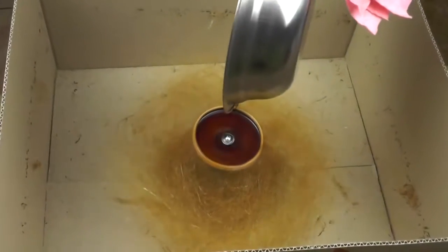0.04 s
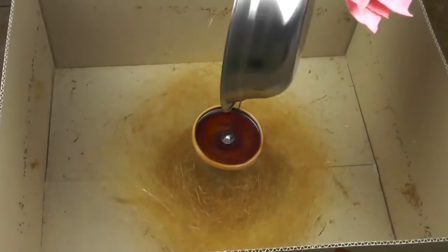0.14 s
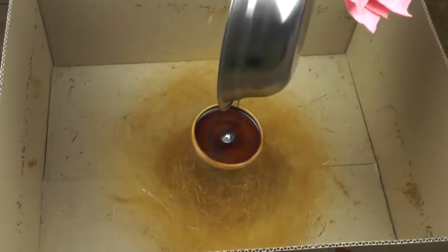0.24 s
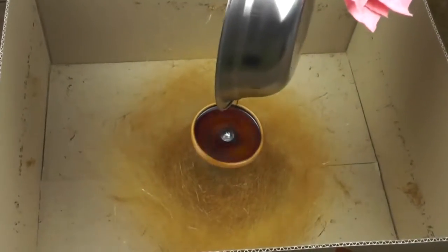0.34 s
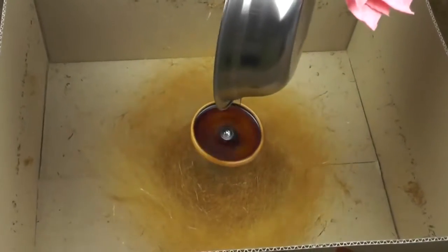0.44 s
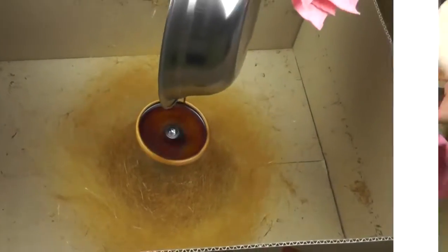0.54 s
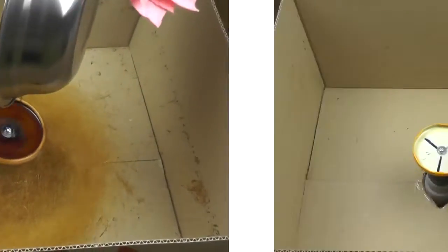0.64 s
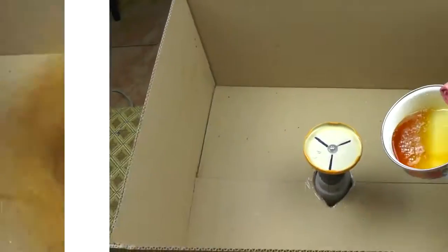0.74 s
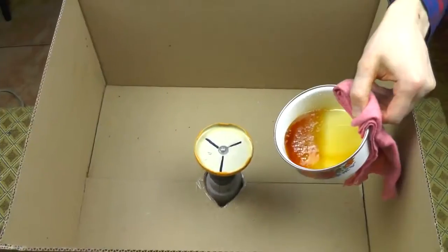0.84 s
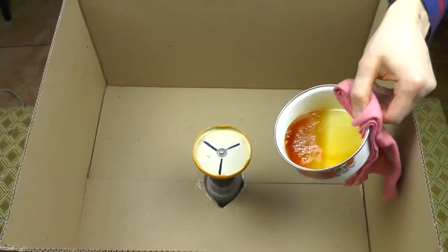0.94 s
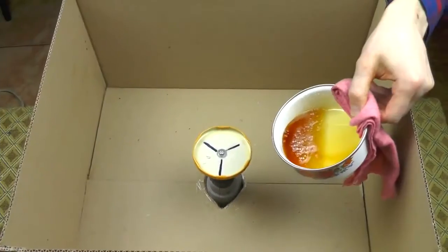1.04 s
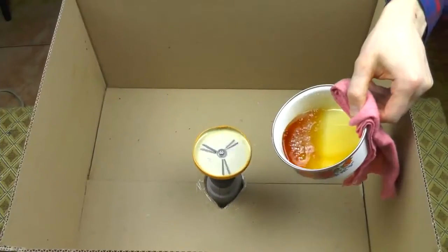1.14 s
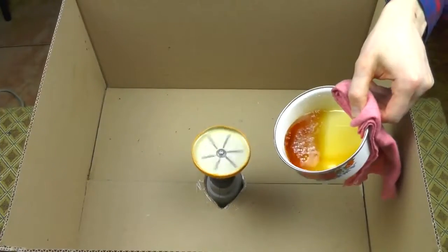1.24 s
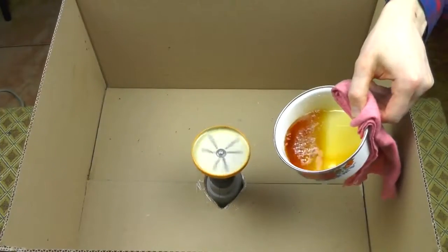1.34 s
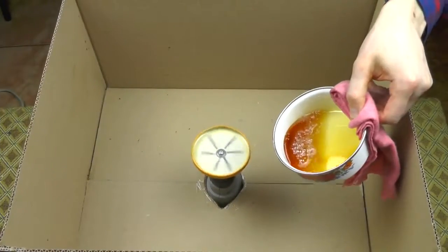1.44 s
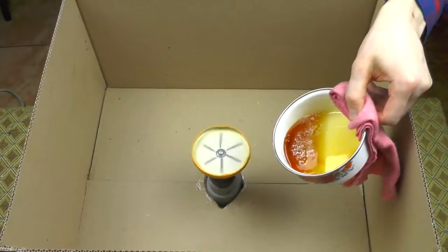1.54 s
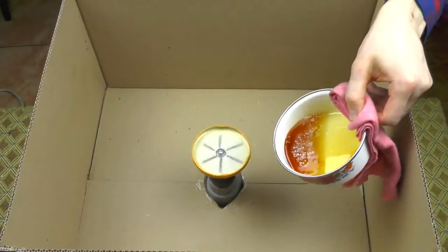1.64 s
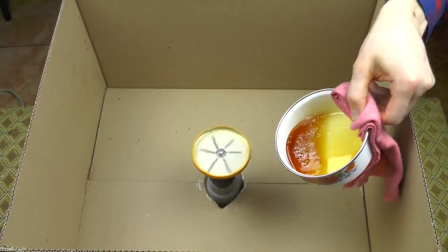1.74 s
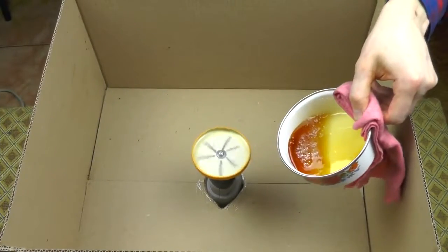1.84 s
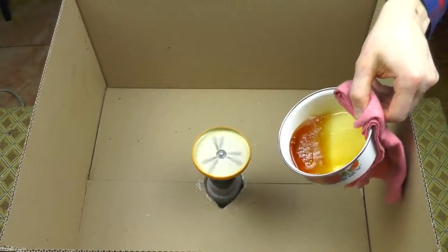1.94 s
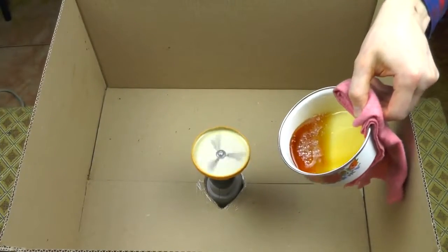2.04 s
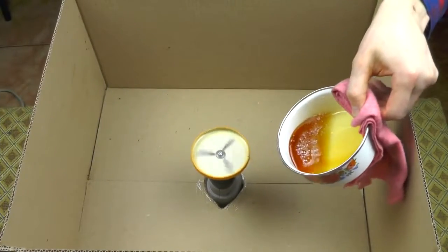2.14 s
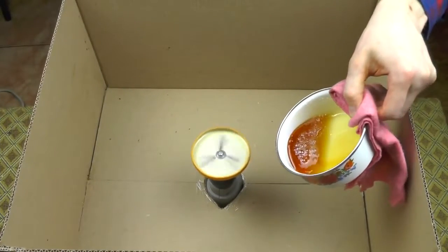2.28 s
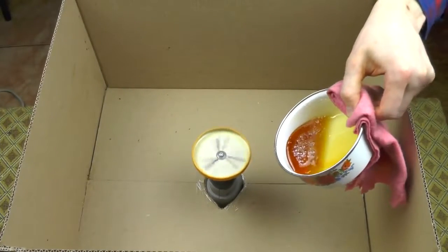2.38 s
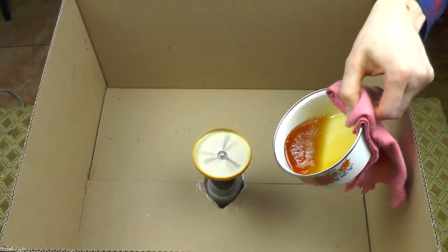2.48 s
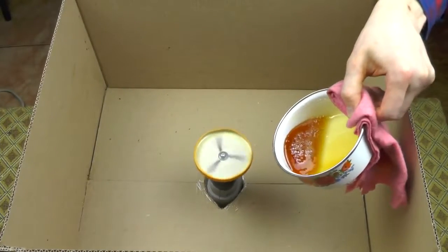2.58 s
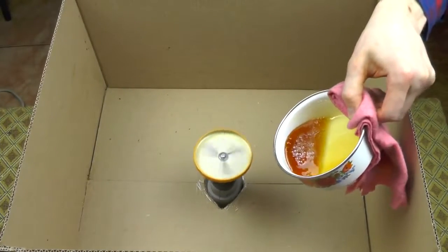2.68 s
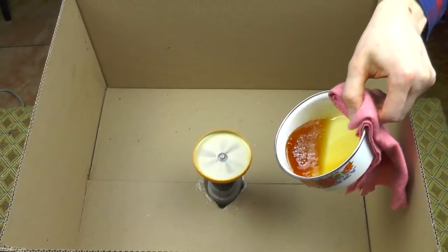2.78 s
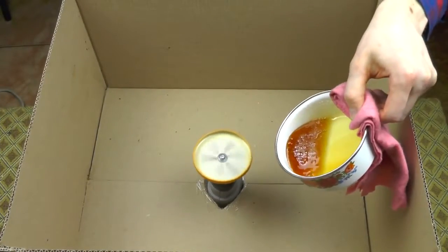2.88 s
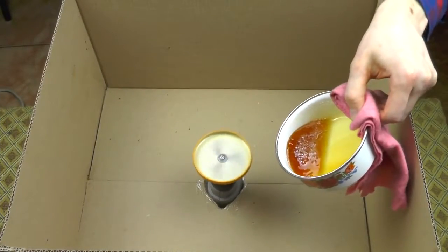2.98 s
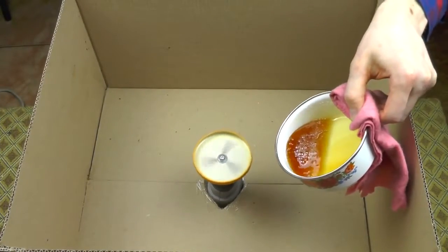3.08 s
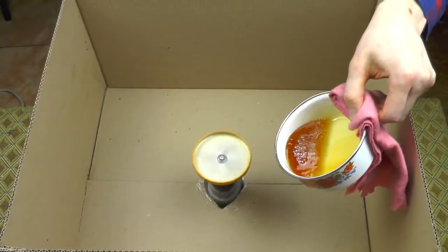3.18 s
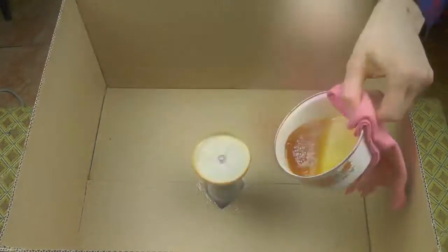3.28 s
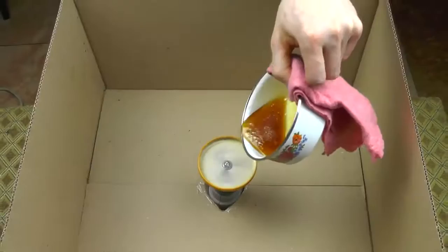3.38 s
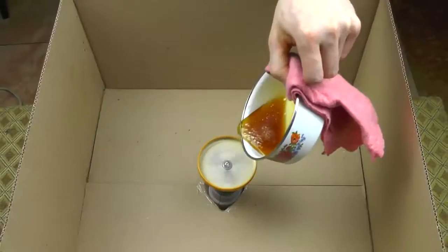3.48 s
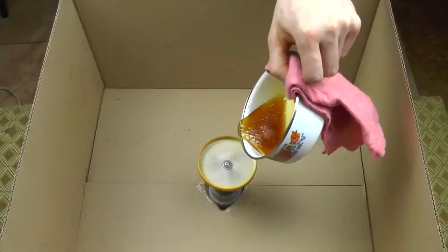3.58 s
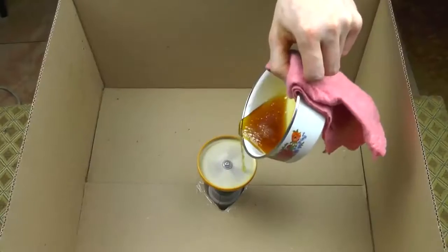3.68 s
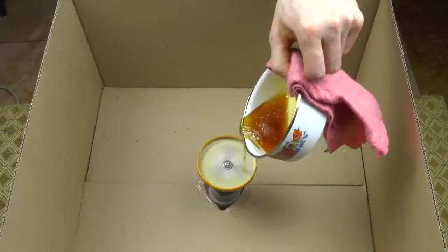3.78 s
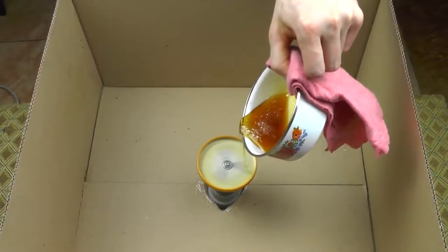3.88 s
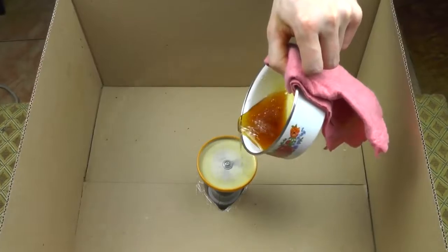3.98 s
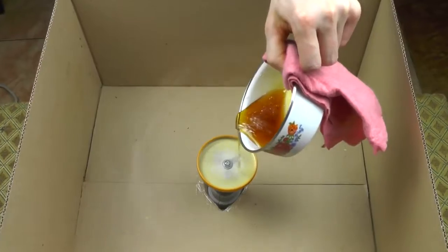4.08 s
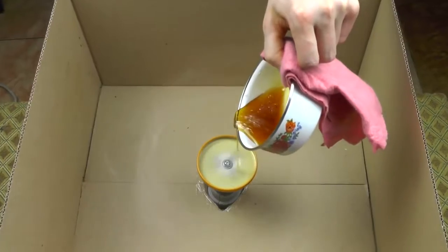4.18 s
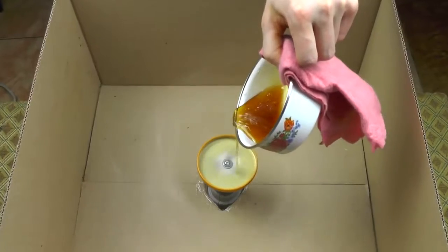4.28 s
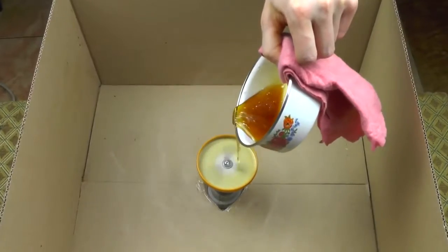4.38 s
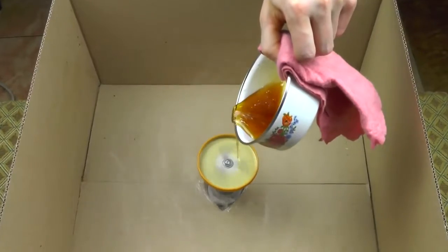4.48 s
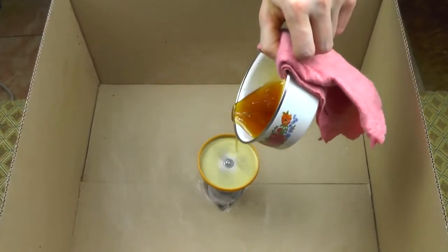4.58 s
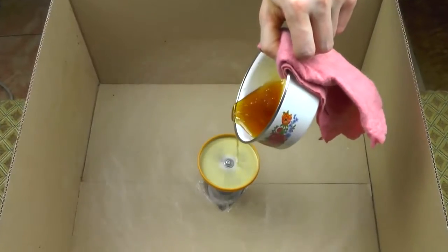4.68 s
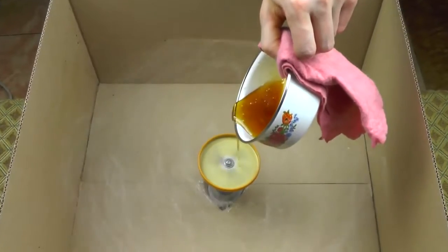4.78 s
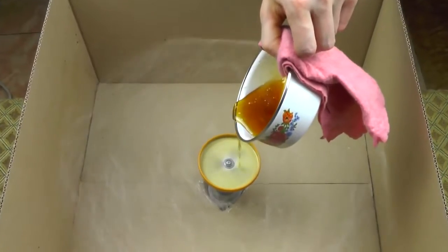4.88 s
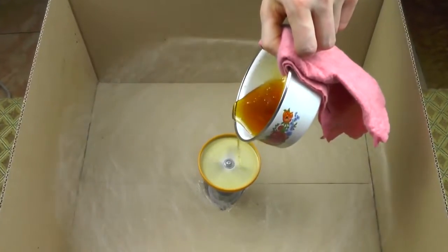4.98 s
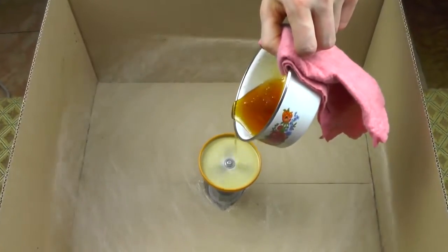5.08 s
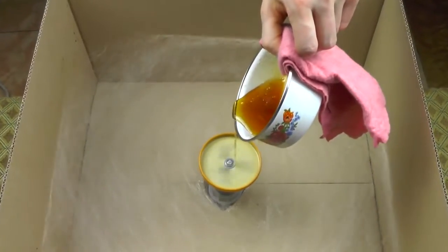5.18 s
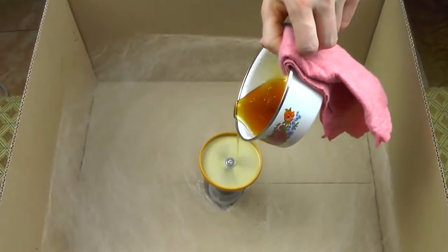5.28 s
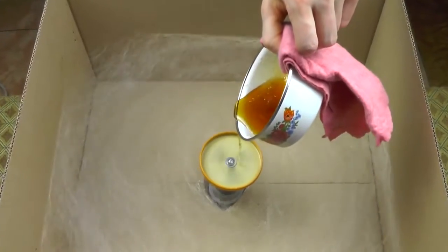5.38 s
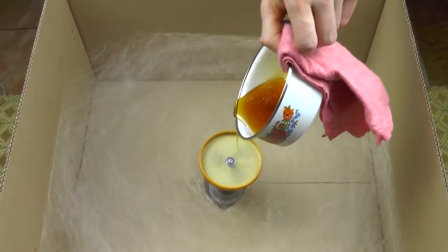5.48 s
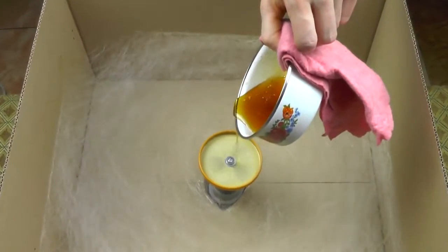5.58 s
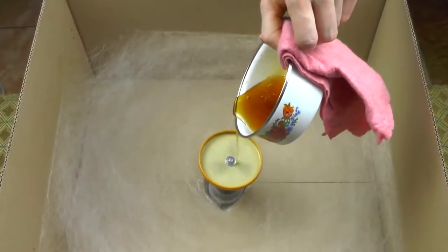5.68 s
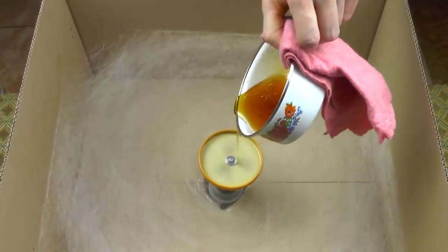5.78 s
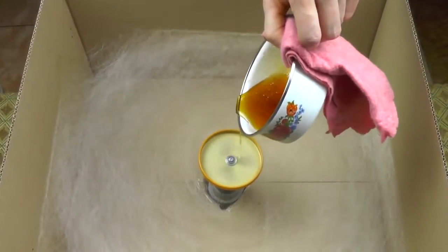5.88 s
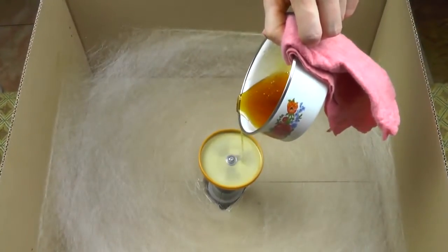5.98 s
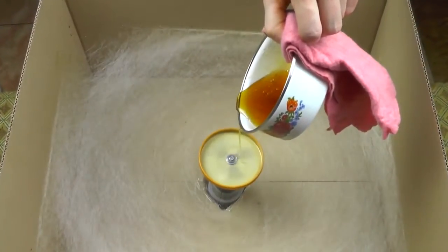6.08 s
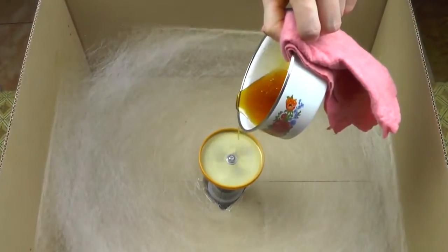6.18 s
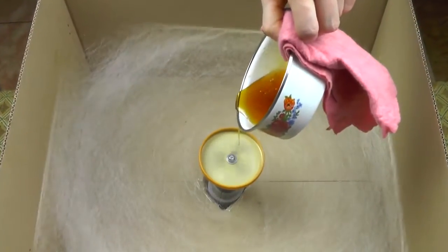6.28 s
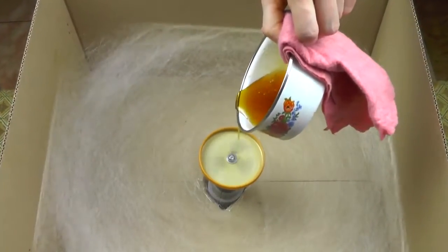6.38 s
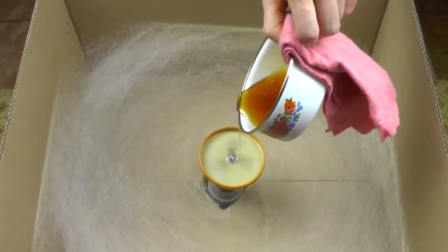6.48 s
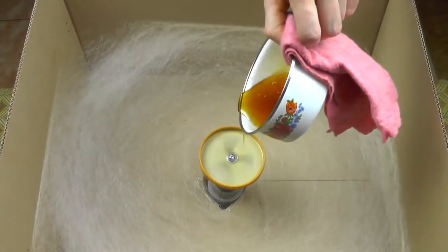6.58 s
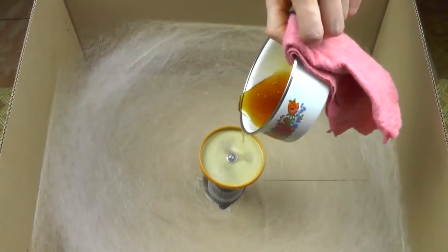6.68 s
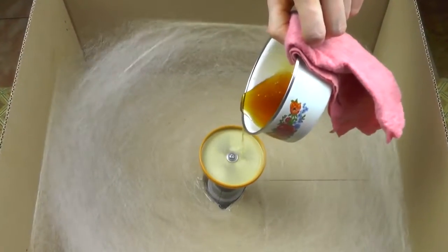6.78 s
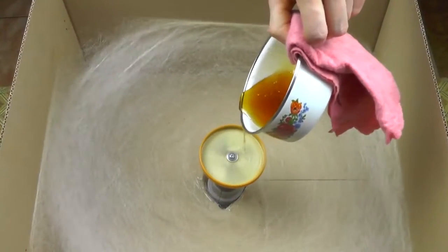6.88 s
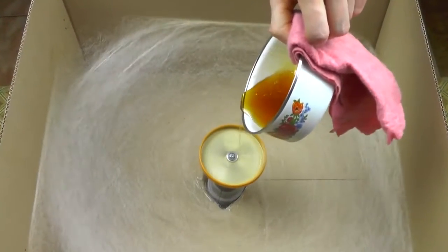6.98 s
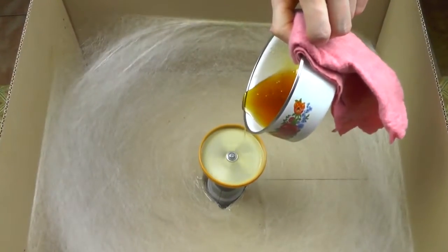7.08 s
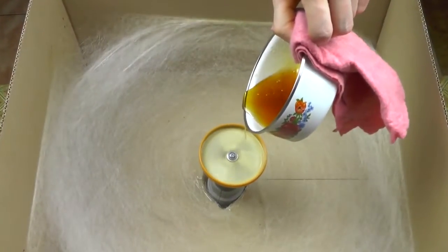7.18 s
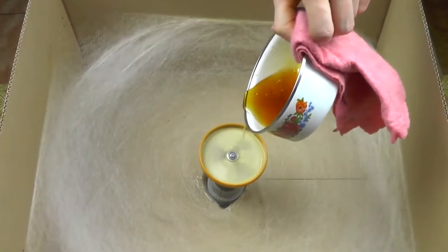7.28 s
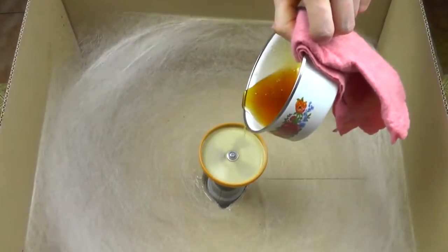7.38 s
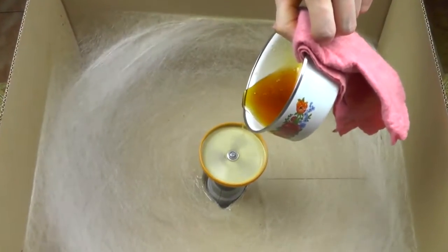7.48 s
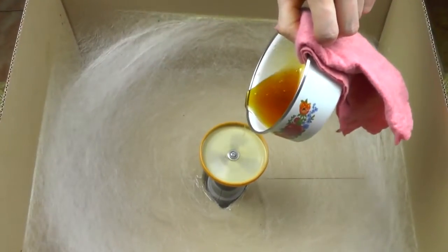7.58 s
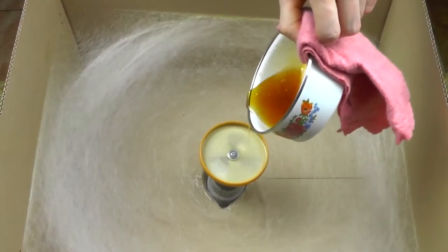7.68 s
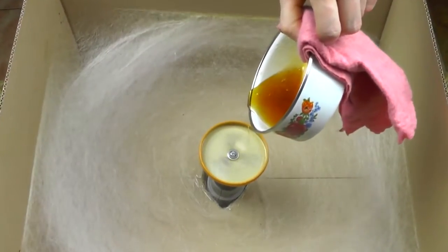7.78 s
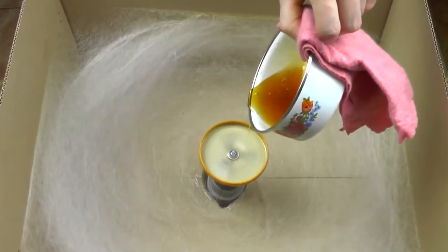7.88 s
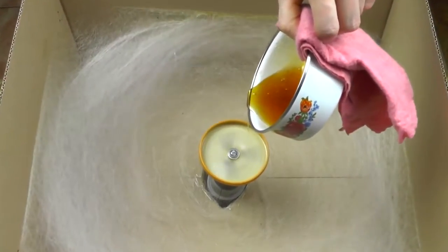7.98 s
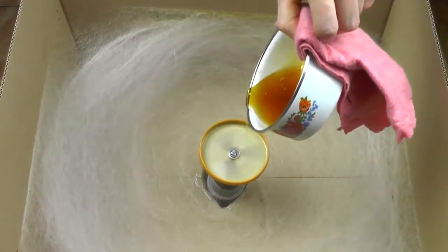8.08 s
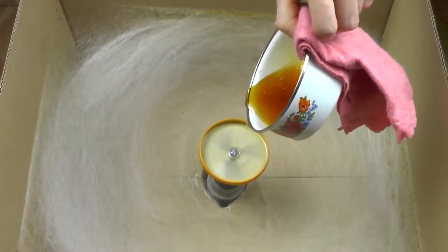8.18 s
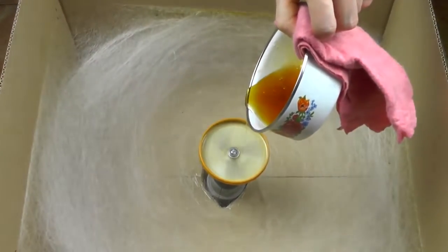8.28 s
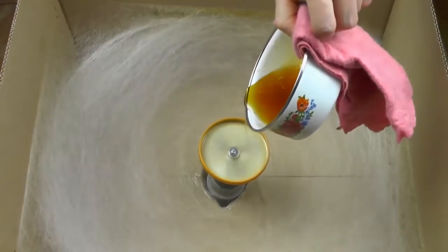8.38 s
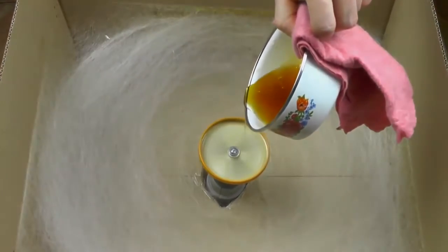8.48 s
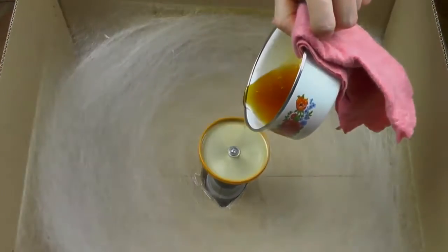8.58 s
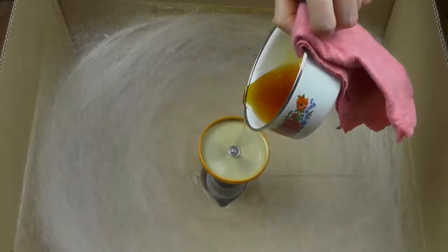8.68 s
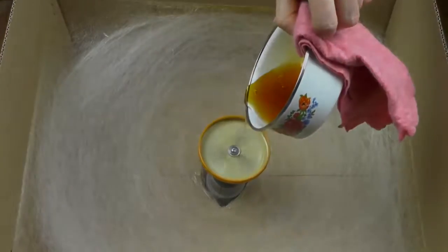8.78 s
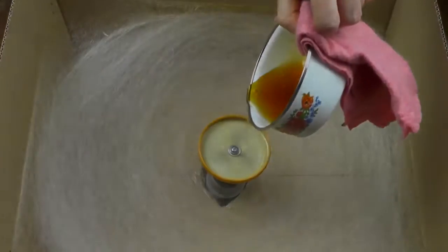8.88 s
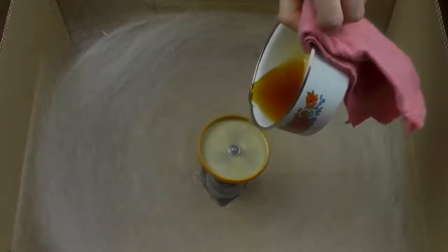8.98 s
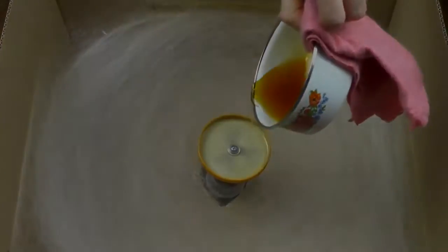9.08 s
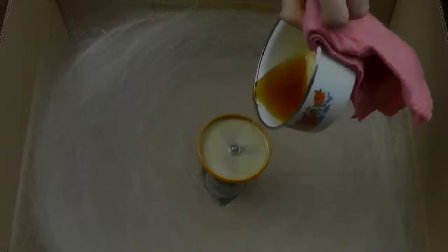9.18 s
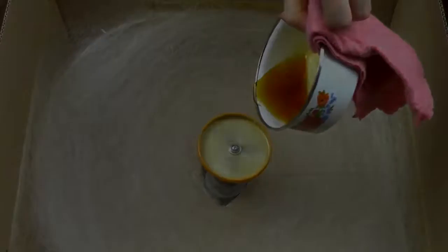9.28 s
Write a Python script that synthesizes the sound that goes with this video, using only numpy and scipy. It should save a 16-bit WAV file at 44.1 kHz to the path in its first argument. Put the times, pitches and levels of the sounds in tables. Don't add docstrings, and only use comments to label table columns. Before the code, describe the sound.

Heard closely in stereo, a small brush motor whirs at full speed in a cardboard box: a breathy rush with buzzing shaft tones, fading out between 0.75 and 0.95 s. A quiet low room hush remains, with tiny switch ticks near 1.05 s. At about 1.27 s the switch bites and loose brushes chatter harshly, with dull knocks, the strongest near 1.47 s, then the rattle coasts down. A second push at 1.93 s clatters until 2.35 s, knocks and fades again. The third, at 2.69 s, rattles as a rough whine climbs from about 2.9 s, reaching full speed by 3.6 s. Then a steady, dense, airy hiss with a low hum continues while syrup is poured and flung. A faint thin whistle appears early, another around 6 to 7.7 s. The hiss gradually dulls, and from 8.1 s eases slightly quieter until it stops at about 9.3 s.

```python
import sys
import numpy as np
from scipy import signal
from scipy.fft import rfft, irfft, next_fast_len
from scipy.io import wavfile
from scipy.ndimage import uniform_filter1d

SR = 44100
rng = np.random.default_rng(int(sys.argv[2]) if len(sys.argv) > 2 else 0)


def wrap_up_sound(samples):
    columns = np.atleast_2d(samples).T
    tamed = np.clip(columns, -1, 1)
    steps = np.round(tamed * 32767).astype(np.int16)
    wavfile.write(sys.argv[1], SR, steps)


def invert_db(level):
    return 10 ** (np.asarray(level, dtype=float) / 20)


N = 411888
T = np.arange(N) / SR
M = next_fast_len(N + SR)
HZ = np.maximum(np.fft.rfftfreq(M, 1 / SR), 1)
FREE_HZ = 493
STEADY_FROM_S = 3.6

# time_s, shaft_hz
SHAFT_SPEED = [(2.7, 130), (2.88, 264), (3.0, 291), (3.08, 320), (3.14, 345), (3.2, 387), (3.3, 445),
               (3.4, 480), (3.5, 491), (3.6, 493), (4.5, 492.8), (6.3, 492.2), (6.8, 490.8), (7.5, 489.5),
               (8.0, 491), (9.34, 490.5)]
# multiple_of_shaft, level_db
SHAFT_TONES = [(1, -1), (2, 3.5), (12, -20), (13, -9.5), (27, -22)]
# pitch_hz, level_db_per_hz
RUN_AIR_SPECTRUM = [(20, -36), (70, -45), (130, -33), (320, -21.5), (480, -15.5), (900, -10.5),
                    (1720, -4.5), (1900, -14), (3200, -14), (4400, -12.5), (6900, -17), (10800, -19.5),
                    (12600, -20), (15700, -24.5)]
# pitch_hz, width_hz, level_db
RUN_RESONANCES = [(168.5, 15, -21), (496, 38, -13.5), (668, 19.5, -11), (864, 41, -4.5), (1045, 39, -3),
                  (1260, 24, -7), (1384, 34, -2.5), (1616, 18, -12), (1680.5, 30, 1), (2064, 76, -8.5),
                  (2590, 190, -16), (3610, 47, -7.5), (3920, 170, -11.5), (4490, 54, -10.5),
                  (4830, 45, -10), (5940, 170, -14), (7880, 400, -15), (9580, 400, -17), (11840, 170, -16),
                  (13200, 800, -16.5)]
# multiple_of_shaft, start_s, end_s, singing_db, resting_db
THIN_WHISTLES = [
    (24, 5.9, 7.7, -40.5, -49),
    (26, 3.3, 4.9, -50, -58),
]
# full_chatter_s, last_25_db_rise_s, chatter_end_s, driven_hiss_db, coasting_hiss_db
SWITCH_JOGS = [
    (1.262, .01, 1.49, -29.5, -35.5),
    (1.933, .008, 2.35, -29, -31.5),
    (2.69, .06, 3.25, -26.6, -70),
]
# start_s, level_db (below full)
SWITCH_BITE = [
    (1.262, -24),
    (1.289, -15),
    (1.311, -5),
    (1.332, 0),
]
# centre_s, half_length_s, shell_ring_db, box_thrum_db
SHAKING_FITS = [(1.326, 0.023, -26, -37), (1.415, 0.04, -23.5, -38), (1.487, .03, -29, -30.5),
                (1.728, 0.045, -36, -35), (1.79, 0.052, -37, -36.5), (1.95, .03, -31, -33),
                (2.084, 0.013, -22, -42), (2.13, .04, -40, -32.5), (2.29, .04, -35, -42),
                (2.506, .05, -32.5, -44), (2.61, 0.04, -36, -55), (2.755, 0.036, -29, -30.5),
                (2.916, .04, -28, -40), (2.993, 0.028, -43, -31.5), (3.072, .03, -29, -38),
                (3.273, .04, -29, -45)]
# pitch_hz, level_db_per_hz
BRUSH_SPECTRUM = [(150, -25), (330, -15.5), (510, -12), (800, -8), (1300, -10), (1700, -10.5),
                  (2300, -17.5), (3500, -10.5), (4700, -13.5), (5600, -19), (8000, -20.5), (10800, -24),
                  (12800, -21), (15700, -28.5)]
# pitch_hz, width_hz, level_db
HOUSING_MODES = [(3110, 30, -5), (3590, 30, 1), (3750, 50, -7), (4130, 70, -5), (4480, 20, 4),
                 (4720, 70, -10), (5450, 50, -8), (6120, 60, -7), (7170, 90, -10)]
# pitch_hz, width_hz, level_db
BOX_PANELS = [(103.5, 12, -17.5), (168.2, 6.9, -0.5), (182.7, 11, -1), (199, 19, -6.5), (218.5, 7.4, -5),
              (280, 4.7, -3.5)]
# pitch_hz, width_hz, level_db
HEAD_SHELL = [(1227, 15, 0), (1200, 45, -6), (1265, 60, -10)]
# start_s, peak_db
SLACK_KNOCKS = [(1.054, -44), (1.266, -31), (1.292, -26), (1.312, -17), (1.332, -24), (1.374, -14),
                (1.41, -22), (1.454, -22), (1.471, -9), (1.93, -21), (1.995, -9), (2.077, -25),
                (2.209, -33), (2.28, -8)]
# pitch_hz, level_db_per_hz
FIRST_AIR_SPECTRUM = [(12, -59.5), (20, -30), (81, -31), (153, -20), (239, -22.5), (268, -17), (308, -20.5),
                      (481, -10), (772, -10.5), (965, -2), (3200, -10), (3790, -8.5), (8740, -17),
                      (12200, -16.5), (15700, -20)]
# pitch_hz, width_hz, level_db
FIRST_RESONANCES = [(151, 9.6, -13.5), (930, 33, -13), (1280, 81, 2), (1430, 110, -2), (1695, 78, -0.5),
                    (2480, 80, -2), (3890, 110, -3), (4900, 47, -1), (8060, 60, -5), (9870, 60, -3),
                    (11830, 150, -18)]
# start_s, peak_db
SWITCH_TICKS = [(1.055, -45), (1.087, -52), (1.289, -35), (1.931, -36)]
# centre_s, level_db
LOW_BUMPS = [(1.48, -52), (2.75, -49), (2.9, -44), (3.0, -46), (3.4, -46), (3.46, -52), (.55, -56)]
# pitch_hz, level_db_per_hz
ROOM_SPECTRUM = [(12, -41), (20, -35), (59, -8), (81, -12), (283, -1), (364, -9), (407, -8), (1310, -21),
                 (2050, -25), (3580, -23), (9240, -32), (12200, -26), (15700, -26)]
# pitch_hz, likeness (0 to 1)
CHANNEL_LIKENESS = [(60, 0.23), (160, 1), (450, 0.92), (1220, 0.8), (2010, 0.89), (4400, 0.89),
                    (5300, 0.96), (7400, 1), (9080, 0.76), (10300, 0.75), (11500, 1), (13000, 0.65)]
# pitch_hz, left_minus_right_db
CHANNEL_LEAN = [(60, 1), (110, 0), (200, -4), (380, -1.5), (700, -0.5), (1290, 0.5), (2380, 1), (4400, 0),
                (8120, 0.5), (15000, 0.5)]


def steady_run():
    end_fade_s, end_fade_db = 8.14, -3
    air_db, air_power_of_speed = -22, 4.7
    shaft_hz, turning = in_time(SHAFT_SPEED)
    ending = np.maximum(0, T - end_fade_s) / (T[-1] - end_fade_s)
    close = invert_db(end_fade_db * ending ** 1.6)

    top_db = 1.08 - 0.11 * (T - STEADY_FROM_S)
    air = rush(RUN_AIR_SPECTRUM, RUN_RESONANCES, peak_db=0.0, patchy_db=0.43, rate=7.0, low_hz=300, top_db=top_db)
    rushing = turning * invert_db(air_db) * (shaft_hz / FREE_HZ) ** air_power_of_speed * air

    tone_db = -44 + np.clip(FREE_HZ - shaft_hz, 0, 5)
    lines = invert_db(tone_db) * tones(shaft_hz, SHAFT_TONES, wobble=0.00065, flutter_db=1.1)
    whistles = 0
    for multiple, start, end, sing_db, rest_db in THIN_WHISTLES:
        turns_s = [start - .3, start + .3, end - .15, end + .15]
        level_db = np.interp(T, turns_s, [rest_db, sing_db, sing_db, rest_db])
        gain = invert_db(level_db)
        whistles = whistles + gain * tones(shaft_hz, [(multiple, 0)], wobble=0.0006, flutter_db=1.8)
    mains_hz = 100.5
    hum = invert_db(-66.5) * tones(mains_hz, [(0.97, 0)], wobble=.004, flutter_db=4)
    return close * (rushing + (T > STEADY_FROM_S) * (lines + whistles + hum))


def spin_up():
    whine_from_s, whine_rest_db = 2.88, -44
    shaft_hz, _ = in_time(SHAFT_SPEED)
    whine_db = np.maximum(hump(shaft_hz, centre=298, span=24, top_db=-30), whine_rest_db)
    sweep_db = hump(shaft_hz, centre=417, span=80, top_db=-43)
    hum_db = hump(shaft_hz, centre=480, span=65, top_db=-44)

    whine = .8 + 0.7 * drift(130)
    whine = whine * tones(shaft_hz, [(9.15, -2), (9.5, 3), (9.85, -4)], wobble=0.007, flutter_db=2.0)
    sweep = .5 + drift(160)
    sweep = sweep * tones(shaft_hz, [(19, 4), (21, -5), (28.5, -1)], wobble=0.0061, flutter_db=3.5)
    hum = tones(shaft_hz, [(.8, -7), (1, -6), (2, 8)], wobble=0.0038, flutter_db=5.5)
    running_up = (T > whine_from_s) & (T < STEADY_FROM_S)
    return running_up * (invert_db(whine_db) * whine + invert_db(sweep_db) * sweep + invert_db(hum_db) * hum)


def jogging():
    hiss_gain, thrum_gain, ring_gain, top_db = jog_levels()
    sizes = invert_db(4.3 * np.minimum(rng.exponential(1, N), 5)) * rng.choice([-1, 1], N)
    clicks_per_s = np.array([[400], [300], [2500]])
    clicks = sizes * (rng.random((3, N)) < clicks_per_s / SR) + 1e-18

    thrum = thrum_gain * evened(resonate(clicks[0], BOX_PANELS), .6)
    ring = ring_gain * invert_db(-1.5) * evened(resonate(clicks[1], HEAD_SHELL), .7)
    rings = sum(swell(4.7, 4.9) * resonate(clicks[2], [mode]) for mode in HOUSING_MODES)
    housing = invert_db(-5) * rms_one(rings)
    hiss = rush(BRUSH_SPECTRUM, [], peak_db=0, patchy_db=0.5, rate=7.4, low_hz=2000, top_db=top_db)
    bite = np.max([(T > s) * invert_db(db) for s, db in SWITCH_BITE], axis=0)
    return bite * (thrum + ring + hiss_gain * (housing + invert_db(0.1) * hiss))


def jog_levels():
    build_db, build_s = 3, .08
    coast_sag_db_per_s, thrum_sag_db_per_s = 13, 14
    drive = driven(rise_share=1, fall_db_per_s=58)
    last_end = SWITCH_JOGS[-1][2]
    coasting = (T > SWITCH_JOGS[0][0]) & (T < last_end)

    hiss_db, thrum_db = [], []
    for db, (full, _, _, driven_db, _) in zip(drive, SWITCH_JOGS):
        hiss_db.append(db + driven_db - build_db * np.exp(-np.abs(T - full) / build_s))
    for _, _, end, _, coast_db in SWITCH_JOGS:
        hiss_db.append(np.where(T > end, coast_db - coast_sag_db_per_s * (T - end), -99))
    for db, jog in zip(driven(1.1, fall_db_per_s=103), SWITCH_JOGS):
        thrum_db.append(db - thrum_sag_db_per_s * (T - jog[0]))
    ring_db = driven(1.1, fall_db_per_s=120)

    thrum = invert_db(-35.5 + np.max(thrum_db, axis=0)) + coasting * invert_db(-50)
    ring = invert_db(-36 + np.max(ring_db, axis=0)) + coasting * invert_db(-50)
    for s, half, shell_db, box_db in SHAKING_FITS:
        thrum = np.maximum(thrum, invert_db(hump(T, s, half, box_db)))
        ring = np.maximum(ring, invert_db(hump(T, s, half, shell_db)))

    top_db = -1 + 1.5 * (np.minimum(T, last_end) - SWITCH_BITE[0][0])
    top_db = top_db + 6.5 * (1 - invert_db(np.max(drive, axis=0)))
    return invert_db(np.max(hiss_db, axis=0)), thrum, ring, top_db


def driven(rise_share, fall_db_per_s):
    levels = []
    for full, rise, end, _, _ in SWITCH_JOGS:
        rising_db = np.minimum(0, 25 * (T - full) / (rise_share * rise))
        levels.append(rising_db - fall_db_per_s * np.maximum(0, T - end))
    return levels


def knocks():
    length, decay_s = 2000, 0.0065
    out = np.zeros(N)
    bursts = rng.standard_normal((len(SLACK_KNOCKS), length)) * np.exp(-np.arange(length) / SR / decay_s)
    for (s, db), burst in zip(SLACK_KNOCKS, bursts):
        i = round(s * SR)
        out[i:i + length] += invert_db(db - 11.5) * burst
    dull = signal.sosfilt(signal.butter(1, [400, 6000], "band", fs=SR, output="sos"), out)
    return dull + invert_db(13) * resonate(out, HEAD_SHELL)


def first_spell():
    shaft_hz, fade_from_s, fade_to_s, fade_bend = 489.1, 0.75, 0.96, 0.87
    fade = np.clip((fade_to_s - T) / (fade_to_s - fade_from_s), 0, 1) ** fade_bend
    air = rush(FIRST_AIR_SPECTRUM, FIRST_RESONANCES, peak_db=-2, patchy_db=0.85, rate=8.2, low_hz=300)
    orders = [(1, -11), (2, 4.5), (13, -2.5), (26, -10)]   # multiple_of_shaft, level_db
    lines = invert_db(-20.0) * tones(shaft_hz, orders, wobble=0.0011, flutter_db=3.5)
    return fade * invert_db(-21.5 + 1.5 * T) * (air + lines)


def ticks():
    tick_s = 0.0036
    shape = sum((T >= s) * invert_db(db) * np.exp(-np.abs(T - s) / tick_s) for s, db in SWITCH_TICKS)
    bright = signal.butter(2, 3000, "high", fs=SR, output="sos")
    return signal.sosfilt(bright, shape * rng.standard_normal(N))


def bumps():
    lumps = sum(invert_db(db) * np.exp(-((T - s) / 0.017) ** 2) for s, db in LOW_BUMPS)
    sub_bass = signal.butter(2, [15, 55], "band", fs=SR, output="sos")
    low = signal.sosfilt(sub_bass, rng.standard_normal((2, N)))
    return lumps * rms_one(low + .8 * low[0])


def room_floor():
    noise = irfft(stereo(invert_db(2 * at_hz(ROOM_SPECTRUM))), M)[:, :N]
    return invert_db(-55.5) * rms_one(noise) * (T > .9)


def rush(spectrum, peaks, peak_db, patchy_db, rate, low_hz, top_db=0):
    power = invert_db(2 * at_hz(spectrum))
    for hz, width, db in peaks:
        power = power + invert_db(2 * (db + peak_db)) / (1 + (2 * (HZ - hz) / width) ** 2) ** 2
    both = stereo(power) * carton()
    both = both * M / np.sqrt(np.sum(np.abs(both[:, HZ > low_hz]) ** 2))
    step = np.clip(np.log2(HZ / 500) / 2, 0, 2)
    bands = []
    for k in range(3):
        share = np.clip(1 - np.abs(step - k), 0, 1)
        bands.append(irfft(both * share, M)[:, :N] * swell(2 * rate, patchy_db))
    low, mid, top = bands
    return swell(rate, 0.51 * patchy_db) * (low + mid + invert_db(top_db) * top)


def carton():
    t60_s, echo_db = .2, -11
    age = np.arange(SR // 2) / SR
    echoes = rng.standard_normal(len(age)) * invert_db(-60 * age / t60_s)
    return np.abs(1 + invert_db(echo_db) * rfft(echoes / np.sqrt(np.sum(echoes ** 2)), M))


def stereo(power):
    mid, side = rfft(rng.standard_normal((2, M))) * np.sqrt(power)
    alike = np.clip(at_hz(CHANNEL_LIKENESS), 0, 1)
    both = np.sqrt(1 + alike) * mid + np.sqrt(1 - alike) * side * [[1], [-1]]
    return both * invert_db(at_hz(CHANNEL_LEAN) / 2 * [[1], [-1]])


def tones(shaft_hz, orders, wobble, flutter_db):
    turn = 2 * np.pi * np.cumsum(shaft_hz * (1 + wobble * drift(12))) / SR
    out = 0
    for k, db in orders:
        gain = np.sqrt(2) * invert_db(db) * swell(6.5, flutter_db)
        out = out + gain * np.sin(k * turn + 6 * rng.random())
    return out


def resonate(x, modes):
    out = 0
    for k, (hz, width, db) in enumerate(modes):
        r = np.exp(-np.pi * width / SR)
        a = [1, -2 * r * np.cos(2 * np.pi * hz / SR), r * r]
        out = out + (-1) ** k * invert_db(db) * signal.lfilter([1 - r * r, 0, r * r - 1], a, x)
    return out


def evened(x, share):
    return rms_one(x / (uniform_filter1d(x ** 2, size=1300) + 1e-12) ** (share / 2))


def rms_one(x):
    return x / np.sqrt(np.mean(x ** 2) + 1e-20)


def hump(x, centre, span, top_db):
    return top_db - 6 * ((x - centre) / span) ** 2


def in_time(rows):
    s, *columns = np.transpose(rows)
    return [np.interp(T, s, c) for c in columns] + [(T >= s[0]) & (T <= s[-1])]


def at_hz(points):
    hz, value = np.transpose(points)
    return np.interp(np.log(HZ), np.log(np.maximum(hz, 1)), value)


def chance(rate):
    r = np.exp(-80 * np.pi * rate / SR)
    noise = rng.standard_normal(N // 40 + 2002)
    return rms_one(signal.lfilter([1], [1, -2 * r, r * r], noise)[2000:])


def every_sample(slow):
    return np.interp(np.arange(N) / 40, np.arange(len(slow)), slow)


def drift(rate):
    return every_sample(chance(rate))


def swell(rate, depth_db):
    return every_sample(invert_db(depth_db * chance(rate)))


def scene():
    floor = room_floor()
    motor = first_spell() + jogging() + knocks() + spin_up() + steady_run()
    return motor + bumps() + ticks() + floor


def band_limit(x):
    return signal.sosfilt(signal.butter(12, 16510, fs=SR, output="sos"), x)


def record(dry):
    mix = signal.sosfilt(signal.ellip(12, .5, 70, 15700, fs=SR, output="sos"), dry)
    return band_limit(mix)


dry = scene()
out = record(dry)
wrap_up_sound(out)
```